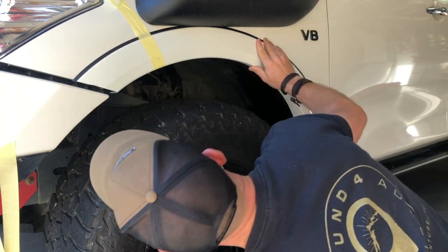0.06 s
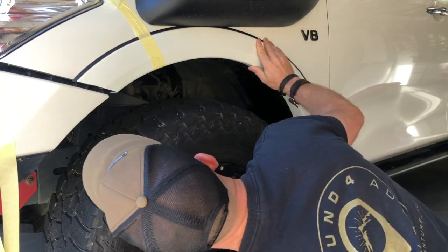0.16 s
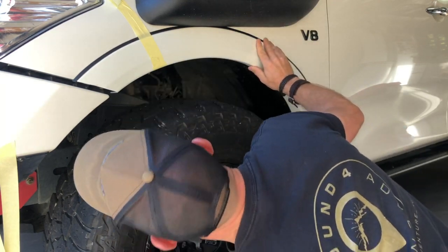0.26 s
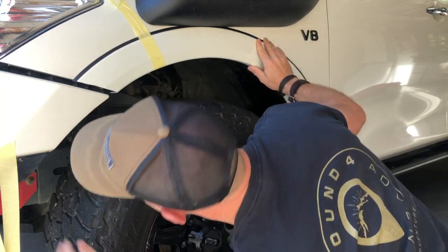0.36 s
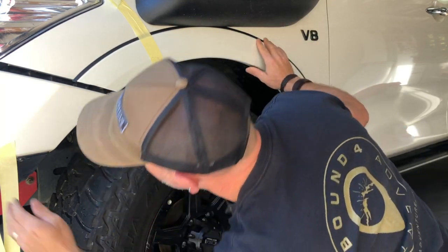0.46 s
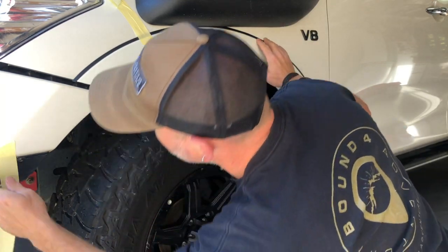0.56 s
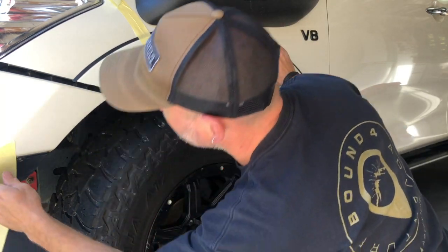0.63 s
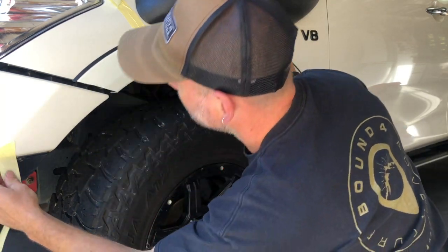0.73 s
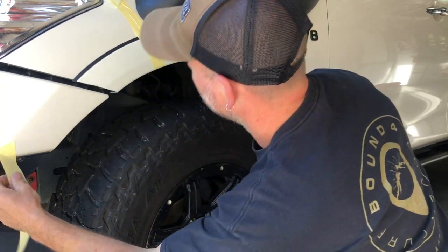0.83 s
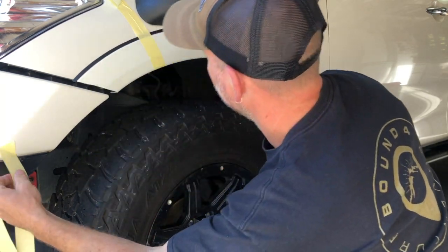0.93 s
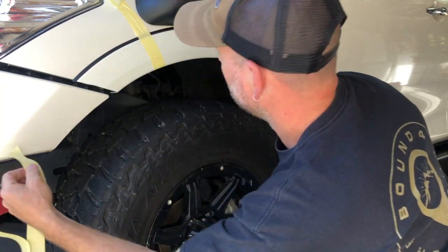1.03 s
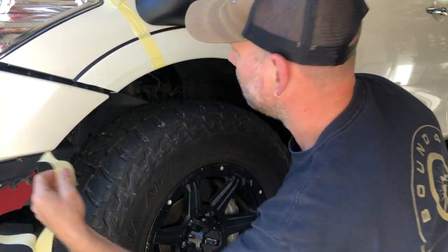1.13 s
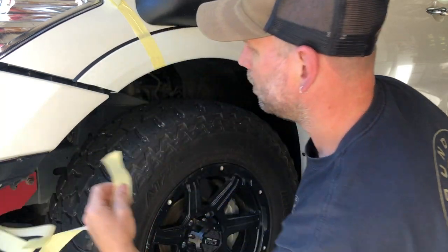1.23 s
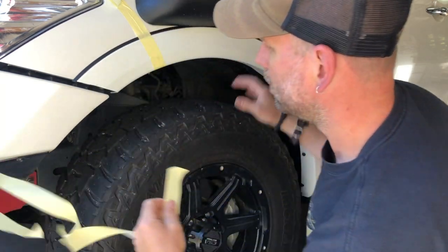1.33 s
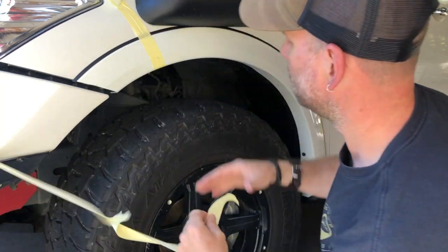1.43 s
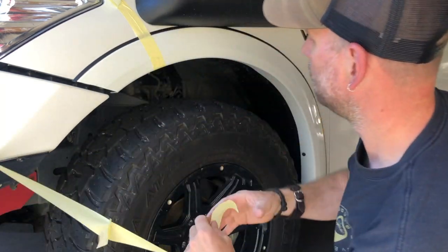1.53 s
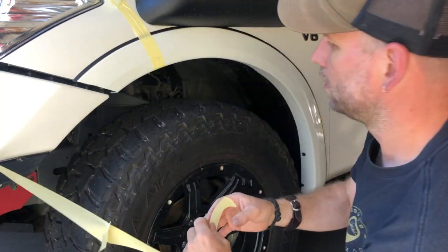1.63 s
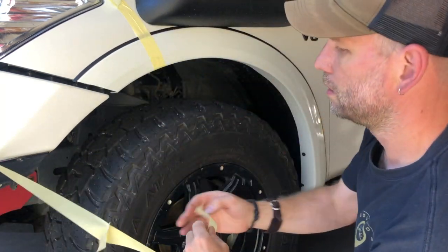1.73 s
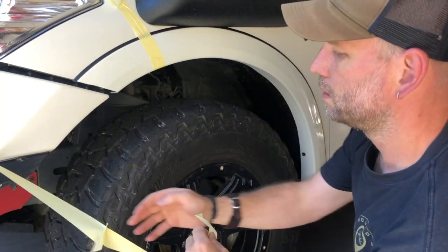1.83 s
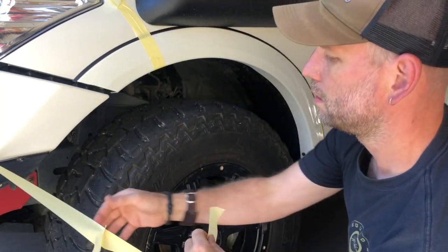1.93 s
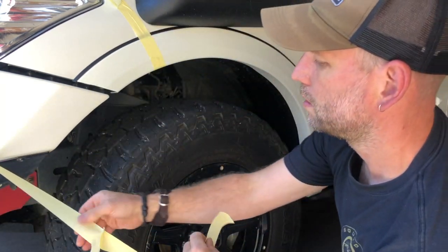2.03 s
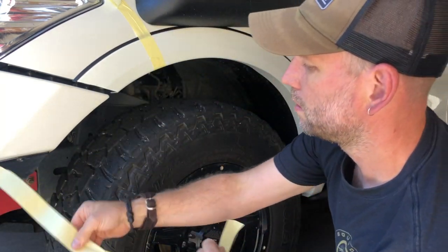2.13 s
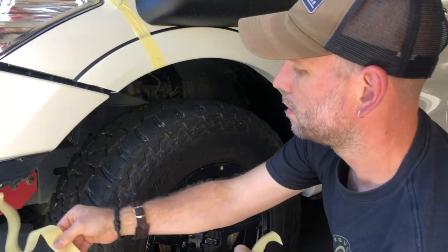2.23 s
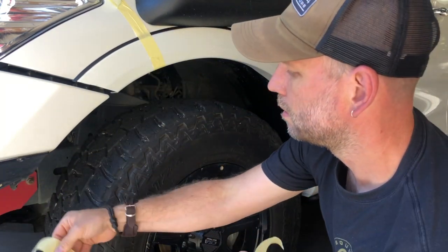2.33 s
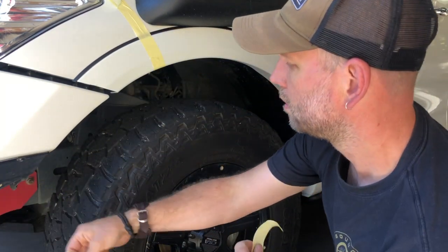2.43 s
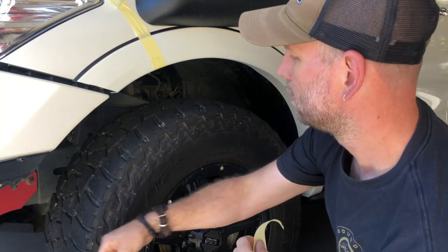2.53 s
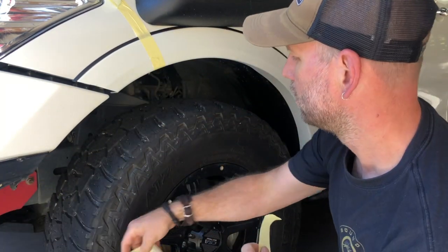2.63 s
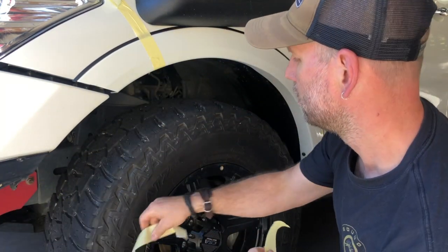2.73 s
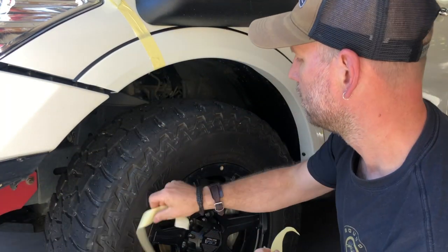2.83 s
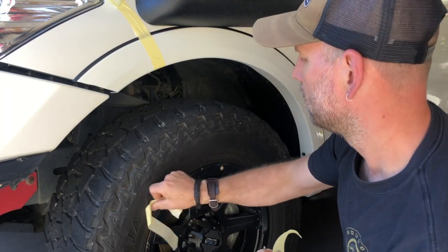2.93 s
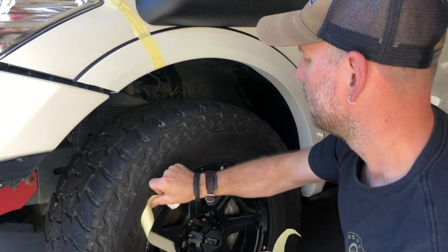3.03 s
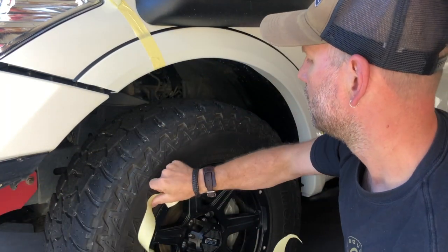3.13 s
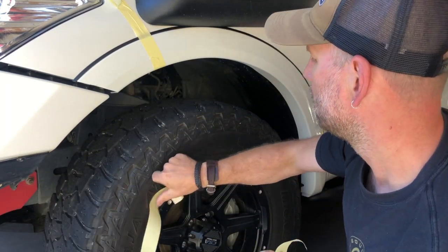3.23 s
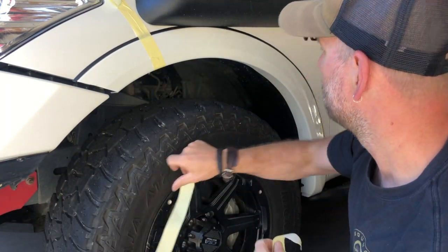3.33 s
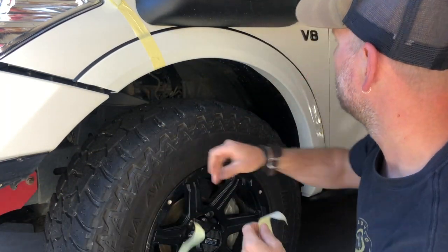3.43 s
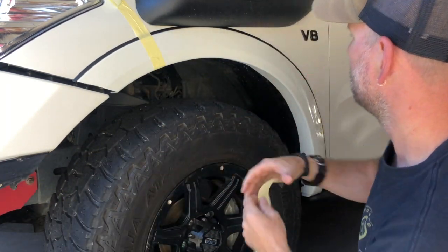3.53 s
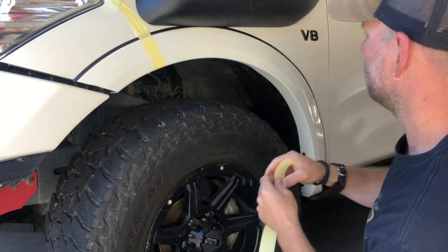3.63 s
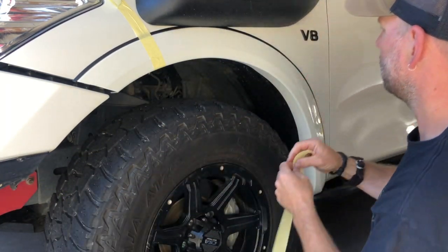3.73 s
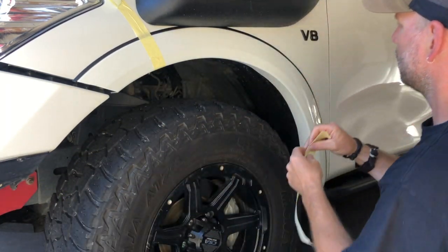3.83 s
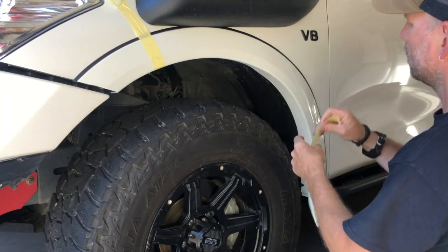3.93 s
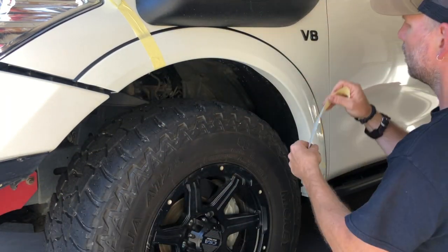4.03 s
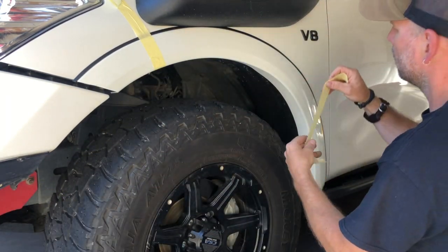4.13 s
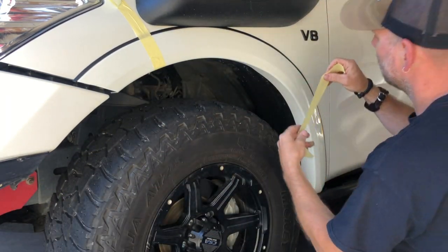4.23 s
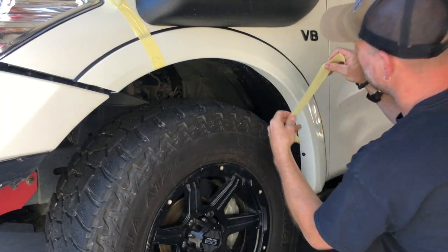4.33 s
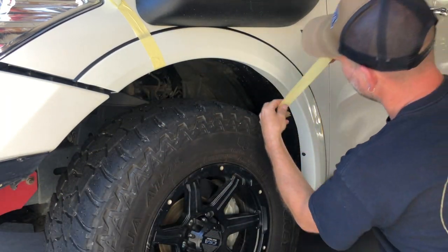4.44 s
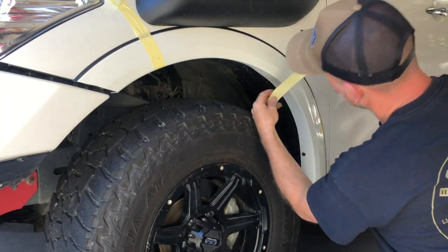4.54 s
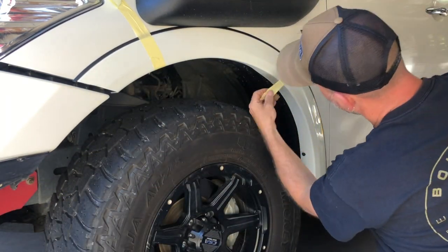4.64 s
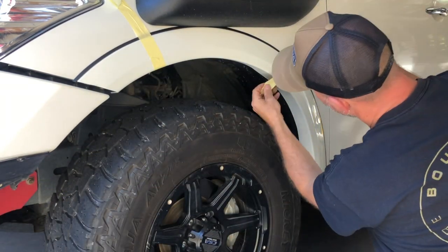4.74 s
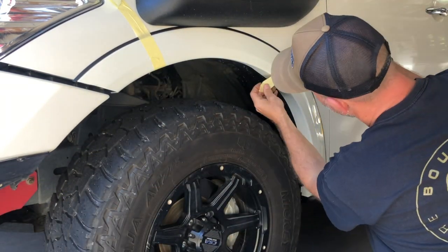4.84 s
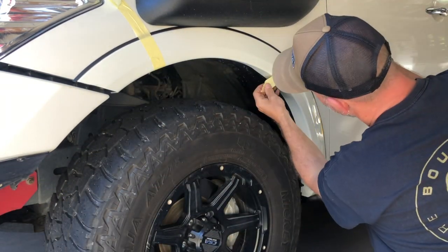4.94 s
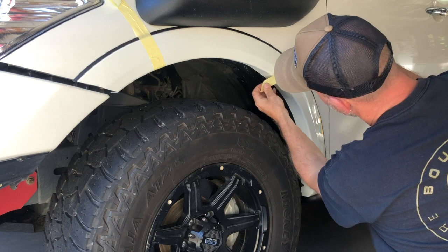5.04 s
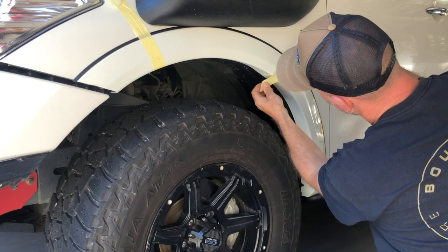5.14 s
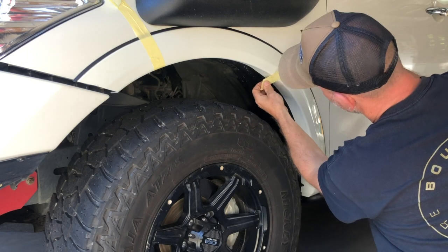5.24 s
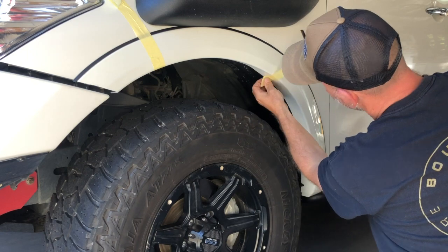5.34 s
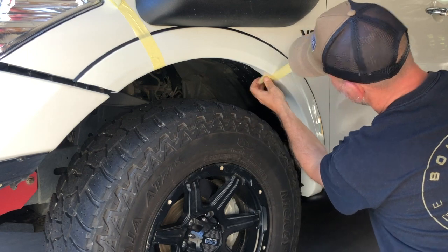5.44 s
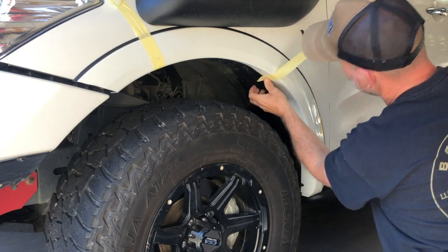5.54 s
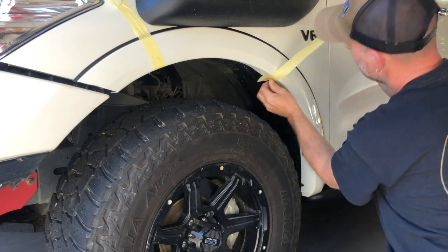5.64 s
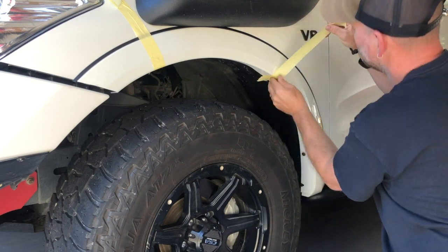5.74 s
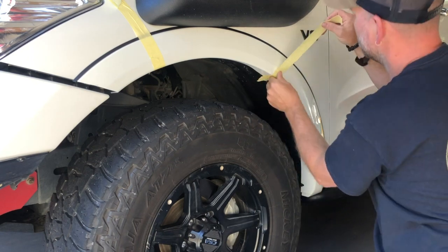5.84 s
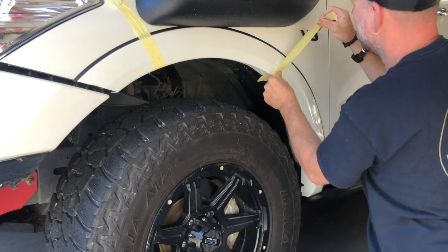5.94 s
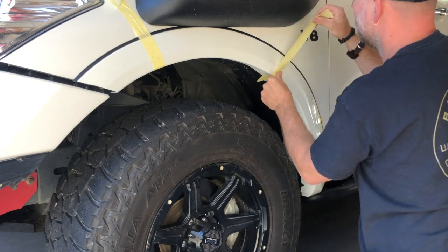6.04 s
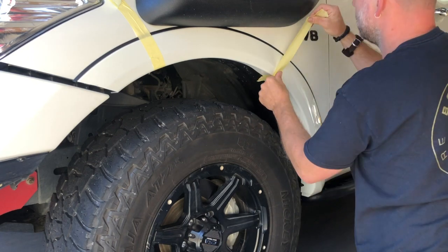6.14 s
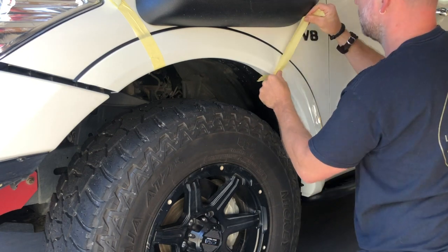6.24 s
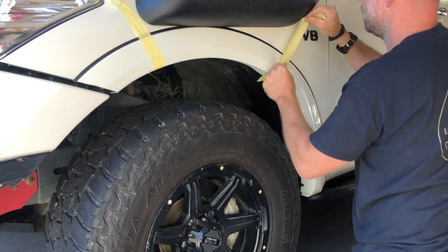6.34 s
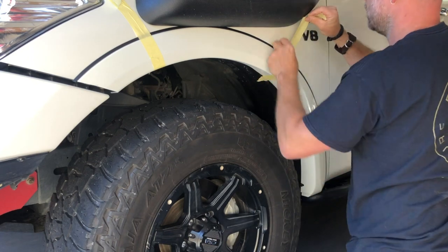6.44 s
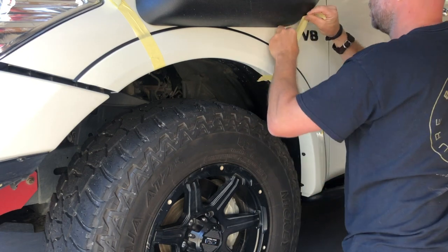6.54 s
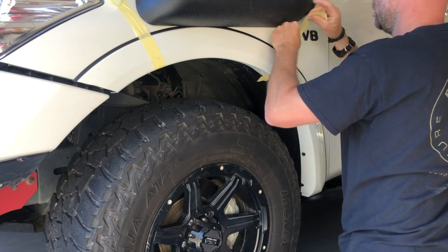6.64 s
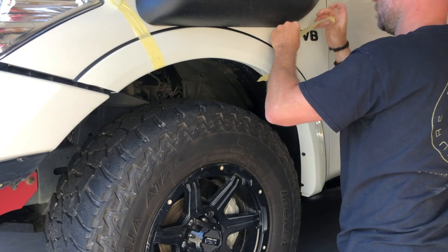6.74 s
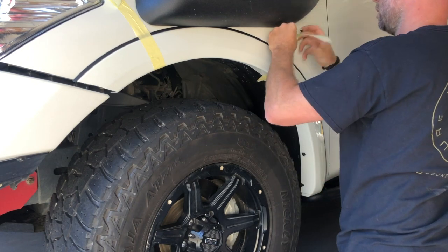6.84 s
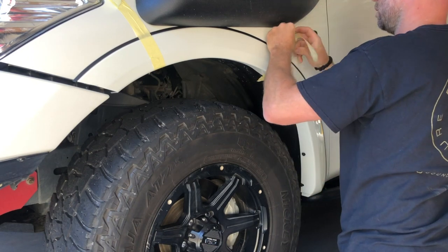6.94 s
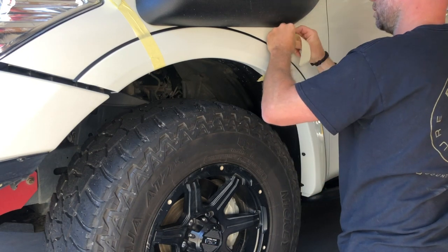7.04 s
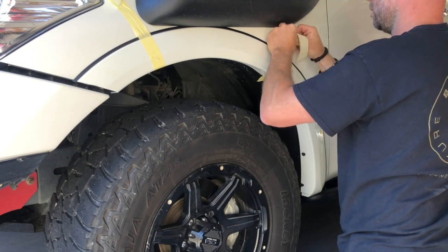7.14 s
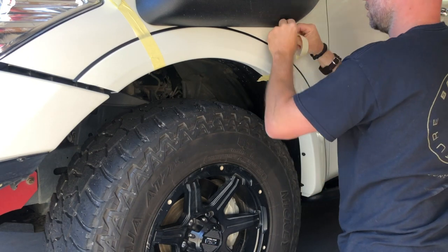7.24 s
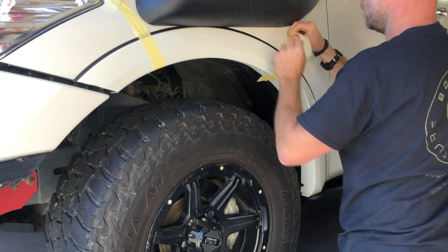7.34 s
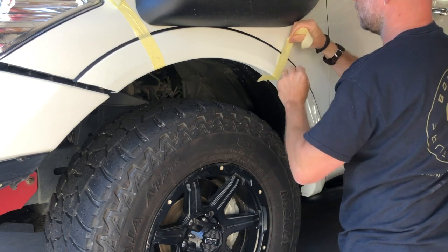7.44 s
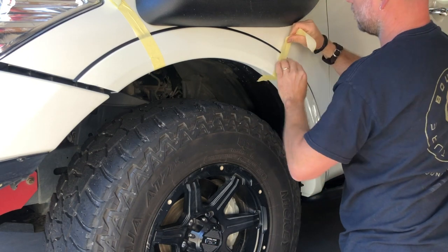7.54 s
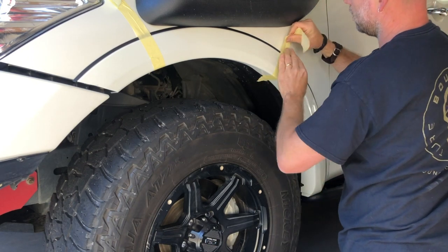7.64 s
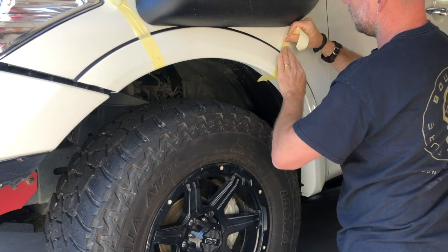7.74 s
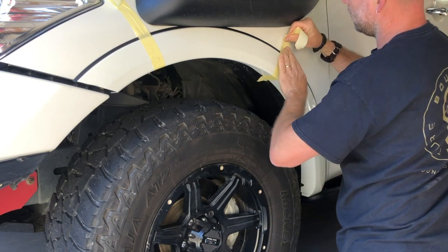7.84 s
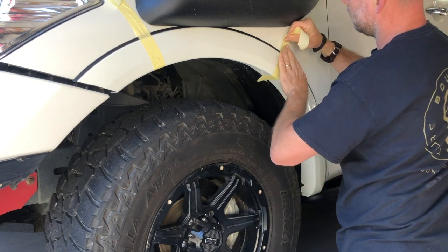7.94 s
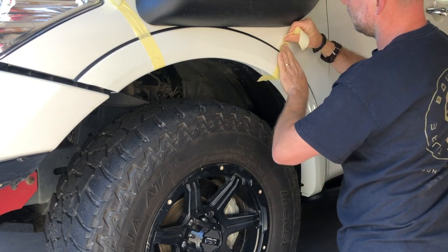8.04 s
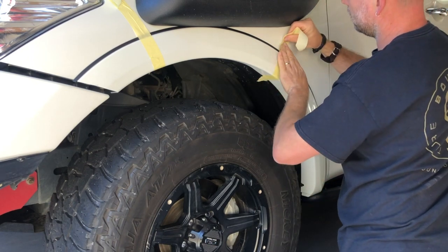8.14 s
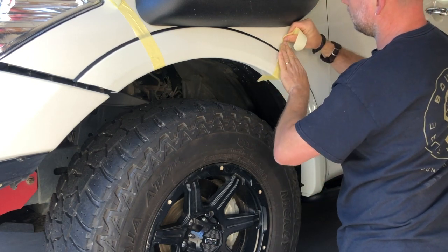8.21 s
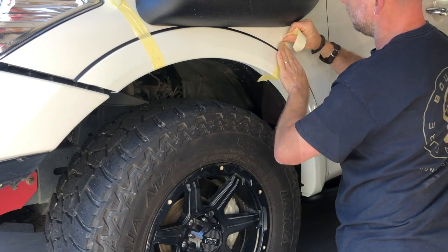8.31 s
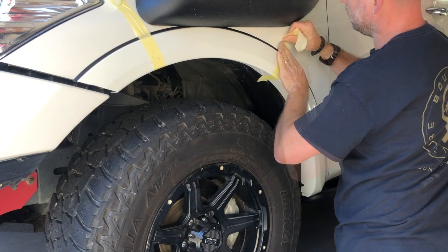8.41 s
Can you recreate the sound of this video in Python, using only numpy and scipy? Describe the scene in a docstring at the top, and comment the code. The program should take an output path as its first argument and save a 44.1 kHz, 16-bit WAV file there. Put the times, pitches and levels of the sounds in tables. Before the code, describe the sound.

Close dry tape rips and sticky crackles, later soft finger pats and rubs on a hollow panel, with faint bird chirps and low outdoor rumble.

```python
"""Masking tape in a garage

Masking tape is torn, peeled, pressed and patted along a car's wheel arch in an open garage.
Taut paper snaps in filtered noise bursts, glue lets go in fine random crackles, and fingers rub the
hollow plastic trim as random slips through a damped resonance. The car and walls answer with a short tail
of random echoes; a bird of gliding sine tones calls faintly outside over a low outdoor rumble of noise."""
import sys
import numpy as np
from scipy import signal
from scipy.fft import rfft, irfft
from scipy.io import wavfile
from scipy.ndimage import uniform_filter1d

SR = 44100
rng = np.random.default_rng(int(sys.argv[2]) if len(sys.argv) > 2 else 0)


def unload_wav(signal):
    """Save mono or channel-first audio to the path in sys.argv[1] as 16-bit WAV at rate SR, clipped to [-1, 1]."""
    wavfile.write(
        sys.argv[1],
        SR,
        np.round(np.clip(np.atleast_2d(signal).T, -1, 1) * 32767).astype(np.int16),
    )


N = 373554  # length of the scene in samples


def amp(db):
    """Decibels to gain."""
    return 10 ** (np.asarray(db) / 20)


def unit(x):
    """Scales to rms 1."""
    return x / np.sqrt(np.mean(x ** 2) + 1e-20)


def read(points, hz):
    """Reads a table on a log-frequency axis."""
    table_hz, value = np.transpose(points)
    return np.interp(np.log(hz + 1), np.log(table_hz + 1), value)


def add(mix, start_s, sound):
    """Mixes a sound in at its start time."""
    part = mix[max(round(start_s * SR), 0):][:len(sound)]
    part += sound[:len(part)]


def even_colour(x, size=31):
    """Spreads the energy of a burst evenly over frequency; size is the smoothing in bins."""
    z = rfft(x)
    power = uniform_filter1d(np.abs(z) ** 2, size=size)
    return irfft(z / np.sqrt(power + 1e-20), len(x))


def breaks(count, per_s, spread_db):
    """Random impulses, as fibres and glue threads let go: many small, a few large."""
    chance, size, sign = rng.random((3, count))
    size_db = spread_db * np.minimum(-np.log(1 - size), 4)
    return (chance < per_s / SR) * amp(size_db) * np.sign(sign - .5)


def paper_click(spectrum, tilt, thud_db=0, ring_hz=4000, ring_db=0, size=1024):
    """The causal (minimum-phase) response of the paper to one tiny break, with energy 1."""
    hz = np.abs(np.fft.fftfreq(size, 1 / SR)) + 1
    db = read(spectrum, hz)
    db += np.clip(tilt, -8, 6) * np.log2(np.maximum(hz, 1200) / 1200)  # tilt acts above 1200 Hz
    db += thud_db / (1 + (hz / 900) ** 4)
    db += ring_db * np.exp(-(4 * np.log2(hz / ring_hz)) ** 2)
    minimum_phase = np.exp(np.conj(signal.hilbert(np.log(amp(db)))))
    click = np.fft.ifft(minimum_phase).real[:size // 2]
    return click / np.linalg.norm(click)


def stroke(length_s, attack_s, edge_db):
    """Force of a hand movement: swells to its top and fades."""
    t = np.arange(0, length_s, 1 / SR)
    force_db = np.interp(t, [0, attack_s, length_s], [edge_db, 0, edge_db])
    return amp(force_db) * signal.windows.tukey(len(t), .12)


def friction(force, hz, width):
    """Uneven slips of skin and tape ring a damped resonance."""
    slips = breaks(len(force) + SR // 20, per_s=1500, spread_db=2.0)
    resonance = signal.iirpeak(hz, hz / (2 * width), fs=SR)
    ring = signal.lfilter(*resonance, slips)
    ring = signal.lfilter(*resonance, ring)[-len(force):]  # twice, for steep flanks
    soft_skin = signal.butter(1, min(2 * hz, SR / 3), fs=SR)  # dulls the top
    return force * unit(signal.lfilter(*soft_skin, ring))


# spectrum of the outdoor rumble and hiss: frequency_hz, level_db_per_hz
OUTDOOR_SPECTRUM = [(20, -36), (32, -17), (48, -4.5), (85, -2.5), (130, -6.5), (300, -8.5), (600, -14.5),
                    (1000, -17.5), (2000, -24), (4000, -26), (8000, -30), (12000, -32), (16000, -38.5)]


def outdoors(level_db=-58, drift_rms_db=.5):
    """Distant rumble and soft hiss: shaped noise whose level slowly wanders."""
    colour = amp(read(OUTDOOR_SPECTRUM, np.fft.rfftfreq(N, 1 / SR)))
    noise = irfft(rfft(rng.standard_normal(N)) * colour, N)
    t = np.arange(N) / SR
    waves = [np.sin(2 * np.pi * (hz * t + rng.random())) for hz in np.geomspace(.2, 3, num=8)]
    return amp(level_db + drift_rms_db * unit(sum(waves))) * unit(noise)


# bird calls: start_s, level_db, pitch_factor
BIRD_CALLS = [(.01, -55.5, 0.984), (.641, -66, 1.22), (1.929, -58, 0.94), (2.569, -56.5, 0.98),
              (3.25, -58.5, 0.97), (4.6, -63, 1.02), (5.275, -58.5, 0.99), (7.84, -57.5, 0.898)]
# glide of the two voices in every call: time_s (from its start), low_voice_hz, high_voice_hz
CALL_GLIDE = [(0, 2384, 4600), (.02, 2900, 5810), (.04, 3307, 6350), (.05, 3372, 6400), (.058, 3146, 6010),
              (.075, 3490, 6500)]


def bird(high_db=-2, note_db=-1, note_hz=4620, note_s=0.033, trill_hz=300, waver_hz=80):
    """Two voices slide mostly upward, the high one shaking more; a short note about one pitch closes the call."""
    out = np.zeros(N)
    at, low_hz, high_hz = np.transpose(CALL_GLIDE)
    t = np.arange(0, at[-1], 1 / SR)
    swell = np.sin(np.pi * (t / at[-1]) ** 2) ** .5
    hump = np.hanning(len(t))
    for start_s, db, pitch in BIRD_CALLS:
        shake = unit(uniform_filter1d(rng.standard_normal(len(t)), size=60))
        voices_hz = pitch * np.array([
            np.interp(t, at, low_hz) + waver_hz * shake,
            np.interp(t, at, high_hz) + trill_hz * shake,
            note_hz + 2 * waver_hz * shake])
        low, high, note = np.sin(2 * np.pi * np.cumsum(voices_hz, axis=1) / SR)
        add(out, start_s, amp(db) * (swell * low + amp(high_db) * hump * high))
        add(out, start_s + note_s, amp(db + note_db) * hump * note)
    return out


# snaps of the tape: start_s, level_db, tilt_db_per_octave, thud_db (below 900 Hz), break_length_s
TAPE_SNAPS = [(.09, -49.5, -11, 7.5, .0009), (0.4912, -44, -7.5, -8.5, .0009),
              (.516, -39.5, -1.5, -2, .0006), (.6265, -47.5, -.5, -4, .0018), (.812, -45, -3.5, -5.5, .002),
              (0.8706, -27, -3, -12, .0007), (0.8828, -25.5, 3, -1, .0009), (0.9114, -15, 0.5, -19, .0008),
              (0.9143, -15, -0.14, -22, .0008), (1.28, -44, 5, 7, .001), (1.295, -36, 0.5, 0.5, .0013),
              (1.303, -33, 4.5, 4, .0017), (1.365, -29.5, 0, -1, .0009), (1.381, -36, 1.5, 8.5, .0013),
              (1.4619, -22, -0.11, -2.5, .0012), (1.468, -32.5, -3.5, 7, .0009), (1.674, -37, 1, 10, .003),
              (2.0495, -27, -1.5, 2, .0016), (2.0686, -27, 4.5, 5, .0016), (2.093, -31, 0, -4, .0009),
              (2.1223, -15.8, -2, -7, .0008), (2.1243, -17.5, -1, -1.5, .0009),
              (2.4541, -34.5, 0, 10, .0005), (2.532, -32.5, 5, 9, .0014), (2.9752, -39.5, -0.5, -33, .0014),
              (3.0132, -43, -3, -32, .0022), (3.0635, -41, -2, -14, .0018),
              (3.5978, -27.5, -1.75, -21, .0012), (3.6633, -39, 3.5, 5, .0022),
              (3.8547, -25, 2.5, 6.5, .0013), (3.888, -33.5, -3, -4.5, .0023),
              (3.8973, -28.5, -2.5, -16, .0016), (4.297, -39, 3.5, 4, .0009),
              (4.7614, -38.5, 1.5, 3, .0024), (4.9673, -48, 2.5, 8.5, .002), (5.3961, -32, 5.5, 5, .0024),
              (6.5722, -34.5, -0.5, 11, .0018), (6.6421, -41, 3.5, 12.5, .0018),
              (6.925, -54, -2, -3, .0023), (7.025, -54, -3.5, 10, .0035), (7.104, -32.5, 6.5, 1, .0024),
              (7.16, -31.5, -8, -2.5, .0009), (7.488, -53.5, -3.7, 2, .001),
              (8.3646, -41.5, -4.5, 8.5, .0019), (8.382, -33, -5, -3.5, .0009)]
# spectrum of snapping paper: frequency_hz, level_db_per_hz
PAPER_SPECTRUM = [(60, -17), (200, -9), (600, -5.5), (1200, -2), (1700, -2), (2400, -3), (3100, -0.5),
                  (4200, 1), (6000, 0), (8500, -3), (12000, -7), (15500, -15.5), (18000, -33)]
# the free strip rings around this pitch, differently at every snap
STRIP_HZ, STRIP_SPREAD_OCTAVES = 1950, .3


def snaps(lead_db=-16.5, lead_lengths=2.2, flutter_db=-15.5, flutter_s=0.0095, softness=0.275, ring_db=4.0):
    """A few fibres give way, an avalanche follows, the freed paper flutters; one track per spot on the strip."""
    spots = np.zeros((3, N))
    t = np.arange(-512, 1536) / SR
    after = np.maximum(t, 0)
    flutter = np.exp(-after / flutter_s) * (t >= 0)
    loudest_db = max(row[1] for row in TAPE_SNAPS)
    for k, (start_s, db, tilt, thud_db, length_s) in enumerate([*TAPE_SNAPS, *tear(), *crinkles()]):
        ring_hz = STRIP_HZ * 2 ** (STRIP_SPREAD_OCTAVES * rng.standard_normal())
        burst = after / length_s * np.exp(1 - after / length_s)
        lead = amp(lead_db) * np.exp(-np.abs(t) / (lead_lengths * length_s))
        # slack paper gives weaker, more fluttering snaps
        slack_db = softness * (loudest_db - db)
        force = burst ** 2 + lead + amp(flutter_db + slack_db) * flutter
        avalanche = even_colour(force * rng.standard_normal(len(t)), size=35)
        avalanche /= np.linalg.norm(avalanche)
        snap = np.convolve(avalanche, paper_click(PAPER_SPECTRUM, tilt, thud_db, ring_hz, ring_db))
        gain = amp(db) * np.sqrt(SR // 200)  # level is the rms if packed into 5 ms
        add(spots[k % len(spots)], start_s + t[0] - length_s / 2, gain * snap)
    return spots


# peeling and sliding tape: start_s, length_s, level_db, tilt_db_per_octave
TAPE_PEELS = [(0.49, 0.1596, -50.5, -2), (0.604, 0.344, -51.5, -.5), (1.084, 0.129, -58, 6.5),
              (1.275, .08, -44, -1.5), (1.358, 0.252, -43.5, -3), (2.035, .1, -37, -1.5),
              (2.371, 0.078, -49.5, 5), (2.469, 0.0816, -39, 1), (2.579, 0.349, -55, 0),
              (2.791, 0.127, -45.5, 2.5), (2.89, 0.258, -49, -0.5), (3.059, 0.2295, -52.5, -0.5),
              (3.59, 0.249, -48.5, -2), (3.815, .24, -42, 0), (3.932, 0.289, -43.5, .5),
              (4.262, .15, -47, -4), (4.351, 0.2536, -46.5, -1), (4.743, 0.0497, -48, 5),
              (4.936, 0.0853, -60, 2), (5.328, .09, -55.5, -1.5), (5.479, 0.068, -49, 2),
              (5.557, 0.08, -45.5, 2.5), (5.676, 0.29, -53.5, -2.5), (5.897, 0.1037, -50, -0.5),
              (5.95, .38, -56.5, 0), (6.49, 0.2487, -46, 0), (6.889, 0.252, -60.5, -3.5),
              (7.084, 0.119, -42.5, -2.5), (7.295, .19, -48.5, -2), (8.123, 0.056, -57.5, 0.5),
              (8.359, 0.215, -42, -6.5)]
# spectrum of glue letting go: frequency_hz, level_db_per_hz
GLUE_SPECTRUM = [(80, -24.5), (300, -8), (800, -7), (2000, -3), (4000, 1.5), (6000, -1), (9000, -3),
                 (12000, -6), (15500, -13.5), (18000, -35.5)]


def peels(sticky_db=1.44):
    """Dense crackle of glue and crepe under each pull, clumped as the glue holds and lets go."""
    out = np.zeros(N)
    for start_s, length_s, db, tilt in TAPE_PEELS:
        force = stroke(length_s, attack_s=.3 * length_s, edge_db=-14.0)
        hold = unit(uniform_filter1d(rng.standard_normal(len(force)), size=220))
        grip = amp(sticky_db * hold)
        crackle = unit(grip * breaks(len(force), per_s=5500, spread_db=3))
        add(out, start_s, amp(db) * np.convolve(force * crackle, paper_click(GLUE_SPECTRUM, tilt)))
    return crumple(out)


def crumple(x, patchy_db=3):
    """The bending strip shifts its colour from moment to moment."""
    z = signal.stft(x, SR, nperseg=256)[2]
    patches = uniform_filter1d(rng.standard_normal(z.shape), size=5, axis=1)  # over time
    patches = uniform_filter1d(patches, size=9, axis=0)  # over frequency
    gain = amp(patchy_db * unit(patches) - patchy_db / 2)
    return signal.istft(z * gain, SR, nperseg=256)[1][:N]


def crinkles(per_s=6, over_peel_db=.5, spread_db=2, tick_s=.0008):
    """Small ticks fall at random inside each peel and share its tilt; gives rows like those of TAPE_SNAPS."""
    rows = []
    for start_s, length_s, db, tilt in TAPE_PEELS:
        for when, size in rng.random((round(per_s * length_s), 2)):
            share = 1 - np.sqrt(when)  # most come early in the pull
            tick_db = db + over_peel_db + spread_db * (2 * size - 1)
            rows.append((start_s + share * length_s, tick_db, tilt, 0, tick_s))
    return rows


# fingers and tape rubbing on the hollow trim and each other, plus one ring of the free strip near 1700 Hz at
# 3.6 s: start_s, length_s, level_db, resonance_hz
TRIM_RUBS = [(.882, 0.026, -40, 270), (.935, .07, -46, 185), (2.9, .07, -52, 4100), (3.594, .04, -43, 1700),
             (3.853, .05, -45, 400), (4.095, .05, -44.5, 104), (5.322, .07, -45, 647),
             (5.365, 0.1495, -44, 220), (5.427, 0.0201, -41.5, 836), (5.501, .042, -36, 620),
             (5.518, .1, -48, 353), (5.659, 0.1163, -43.5, 553), (5.741, .14, -48, 560),
             (5.891, 0.1313, -56.5, 715), (7.279, 0.173, -54.5, 230), (8.378, 0.065, -38.5, 303),
             (8.425, .12, -39.5, 283), (8.405, 0.061, -40, 170)]


def rubs(width=.49):
    """Each rub swells and fades on its own resonance; width is a share of its pitch."""
    out = np.zeros(N)
    for start_s, length_s, db, hz in TRIM_RUBS:
        force = stroke(length_s, attack_s=.3 * length_s, edge_db=-14.5)
        add(out, start_s, amp(db) * friction(force, hz, width * hz))
    return out


# first and last break of the tear: level_db, tilt_db_per_octave, thud_db, break_length_s
TEAR_FIRST, TEAR_LAST = (-22.5, -2.2, -20, .00055), (-27.5, 2.5, 4, .00065)


def tear(count=7, start_s=.9276, gap_s=.004, jitter=.13):
    """Quick breaks cross the strip, weaker and brighter each time; gives rows like those of TAPE_SNAPS."""
    steps = np.arange(count) + jitter * rng.standard_normal(count)  # jitter is a share of one gap
    return np.column_stack([start_s + gap_s * steps, np.linspace(TEAR_FIRST, TEAR_LAST, count)])


# fingers patting the tape down on the panel: start_s, level_db, length_s
FINGER_PATS = [(5.043, -49.5, .13), (5.319, -43, .05), (5.495, -45, .06), (5.745, -51, .13),
               (6.183, -47.5, .04), (6.572, -46.5, .09), (7.157, -41, .1), (7.911, -50, .16)]


def pats(attack_s=.0049, panel_hz=832, panel_width_hz=1090):
    """Fingers land quickly on the panel and slide to rest, ringing its broad resonance."""
    out = np.zeros(N)
    for start_s, db, length_s in FINGER_PATS:
        force = stroke(length_s, attack_s, edge_db=-17.0)
        add(out, start_s, amp(db) * friction(force, panel_hz, panel_width_hz))
    return out


def car_side(x, scatter_db=-11, fade_s=.0125, gap_s=.002):
    """Wing, tyre and floor scatter the sound within a few hundredths of a second."""
    t = np.arange(SR // 16) / SR
    taps = breaks(len(t), per_s=5000, spread_db=3.5) * np.exp(-t / fade_s) * (t > gap_s)
    taps = even_colour(taps, size=11)
    return x + amp(scatter_db) * signal.oaconvolve(x, taps / np.linalg.norm(taps))[:N]


# colour of the wall echoes: frequency_hz, level_db
WALL_COLOUR = [(100, 4.5), (400, -1), (1000, 2), (2400, 0), (5500, 0.5), (8000, -1.5), (12000, -3),
               (16000, -1)]
# decay of the garage: frequency_hz, t60_s
GARAGE_DECAY = [(200, 0.7), (700, 0.46), (1800, 0.4086), (5000, 0.429), (9000, 0.33), (15000, 0.3)]


def garage(x, build_s=0.002):
    """Wall echoes thicken and die away, the treble sooner than the bass."""
    t = np.arange(SR) / SR
    longest_s = max(row[1] for row in GARAGE_DECAY)
    fade = (1 - np.exp(-t / build_s)) * np.exp(-np.log(1000) * t / longest_s)
    echoes = even_colour(breaks(SR, per_s=5000, spread_db=2.5) * fade, size=81)
    hz, at, z = signal.stft(echoes, SR, nperseg=256)
    extra_rate = 1 / read(GARAGE_DECAY, hz)[:, None] - 1 / longest_s
    absorbed = np.exp(-np.log(1000) * at * extra_rate)
    coloured = z * amp(read(WALL_COLOUR, hz)[:, None]) * absorbed
    tail = signal.istft(coloured, SR, nperseg=256)[1][:SR // 2]
    return signal.oaconvolve(x, tail / np.linalg.norm(tail))[:N]


def scene():
    """Tape and trim close by, the bird faint, all heard as one channel on both sides."""
    spots = snaps()
    hand = peels() + rubs() + pats()
    call = bird()
    # each spot along the strip has its own paths to the car and the walls
    snap = sum(car_side(spot) + garage(amp(-10.0) * spot) for spot in spots)
    near = car_side(amp(0.5) * hand + amp(-2.5) * call)
    wet = garage(amp(-9.0) * hand + amp(-5) * call)
    mono = snap + near + wet + outdoors()
    return np.array([mono, mono])


def record(dry, low_cut_hz=36, edge_hz=15950):
    """The microphone's bass cut and the recorder's band limit."""
    bass_cut = signal.butter(4, low_cut_hz, "highpass", fs=SR, output="sos")
    thinned = signal.sosfilt(bass_cut, dry)
    band_limit = signal.firwin(511, edge_hz, window=("kaiser", 9), fs=SR)
    return signal.oaconvolve(thinned, band_limit[None], "same")


dry = scene()
out = record(dry)
unload_wav(out)
```